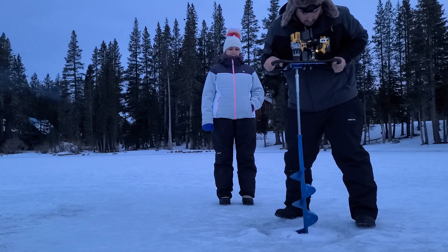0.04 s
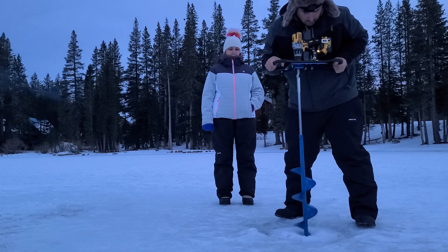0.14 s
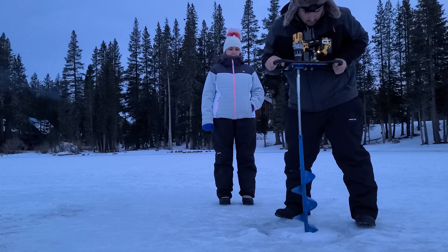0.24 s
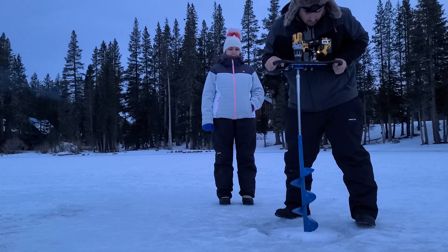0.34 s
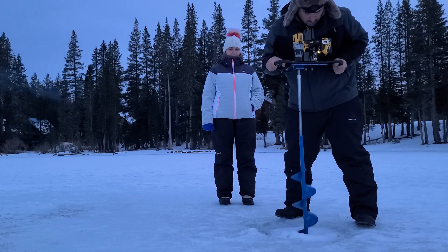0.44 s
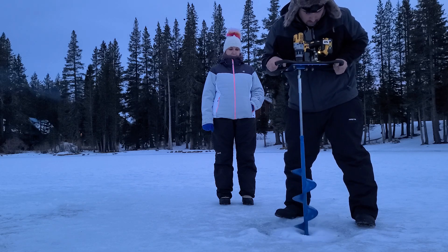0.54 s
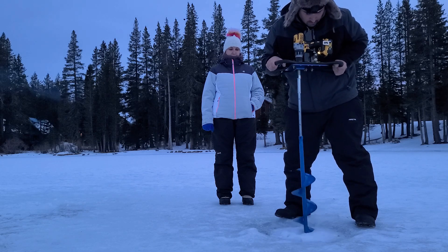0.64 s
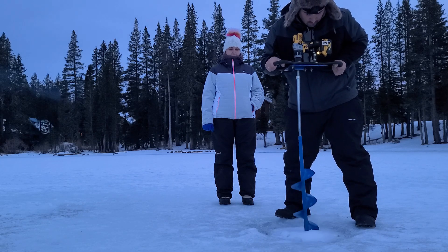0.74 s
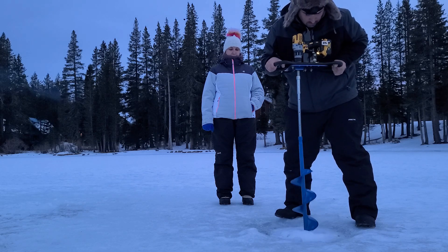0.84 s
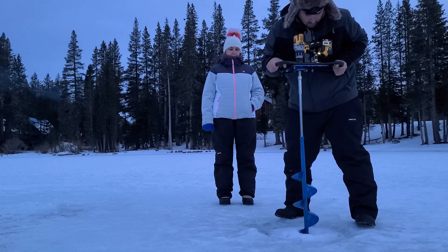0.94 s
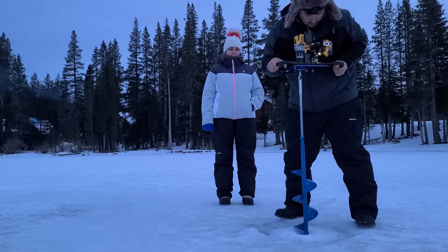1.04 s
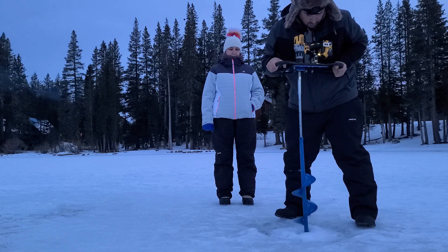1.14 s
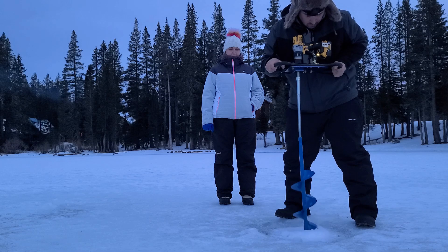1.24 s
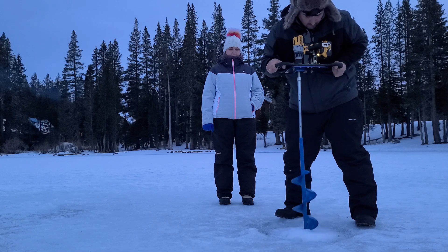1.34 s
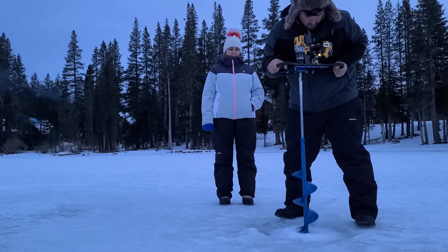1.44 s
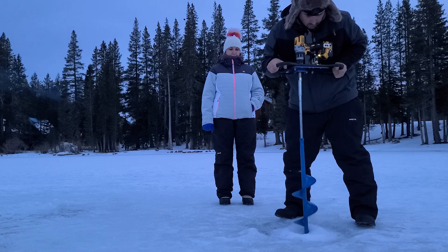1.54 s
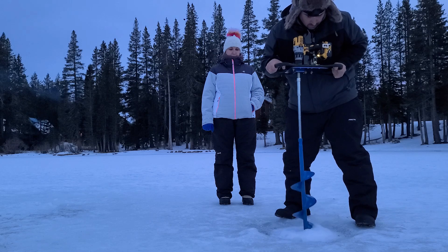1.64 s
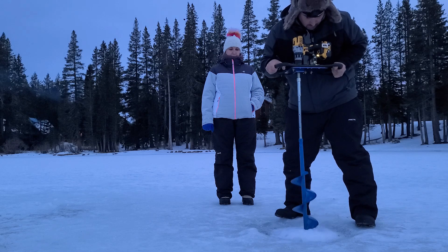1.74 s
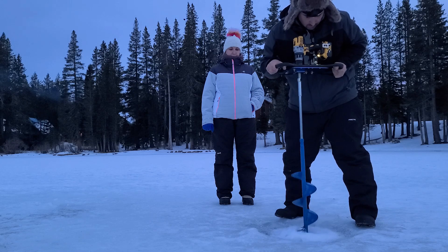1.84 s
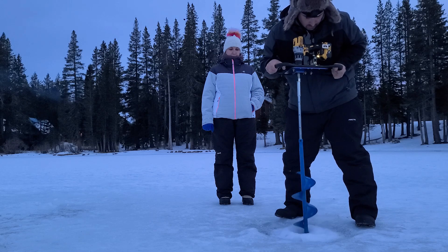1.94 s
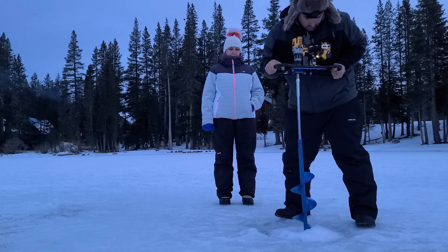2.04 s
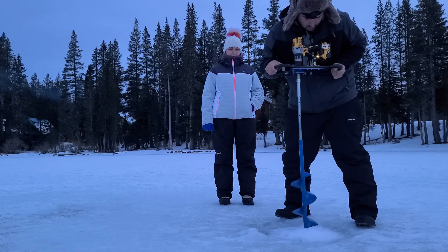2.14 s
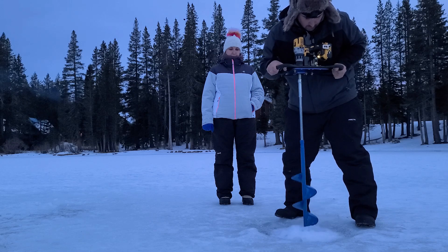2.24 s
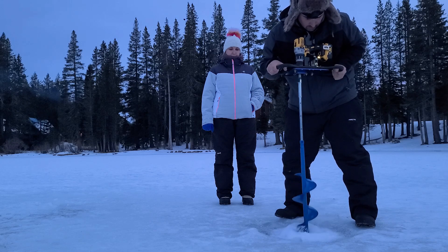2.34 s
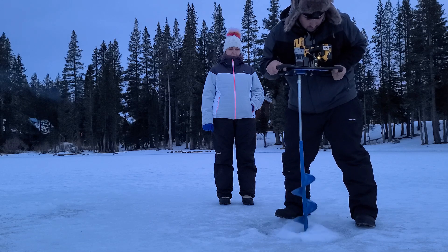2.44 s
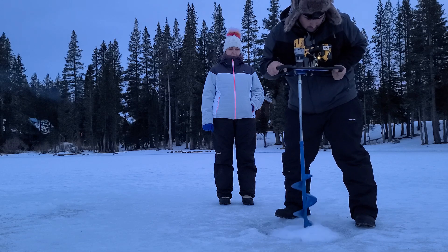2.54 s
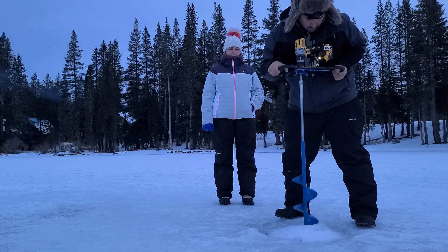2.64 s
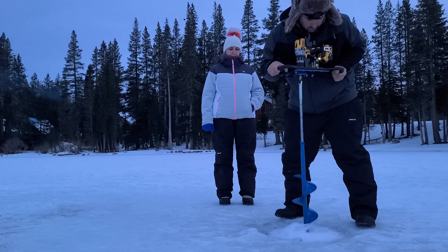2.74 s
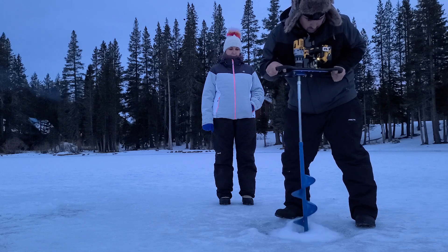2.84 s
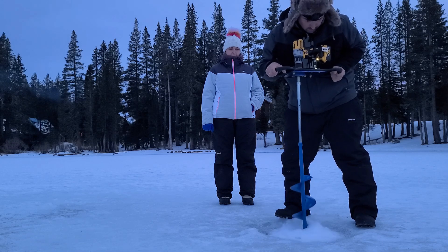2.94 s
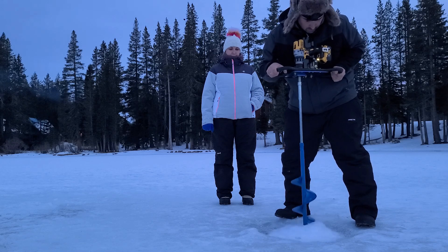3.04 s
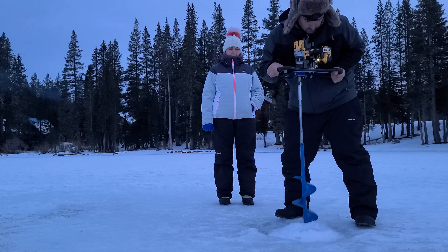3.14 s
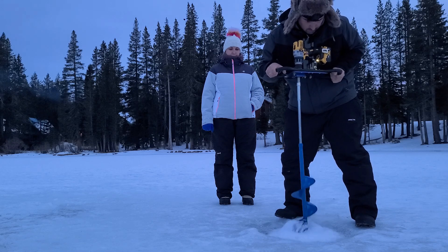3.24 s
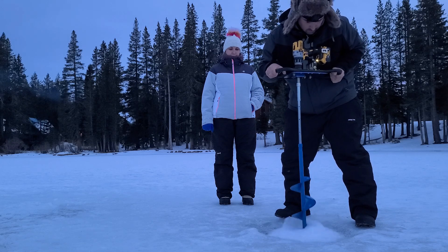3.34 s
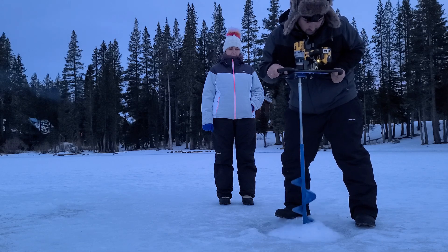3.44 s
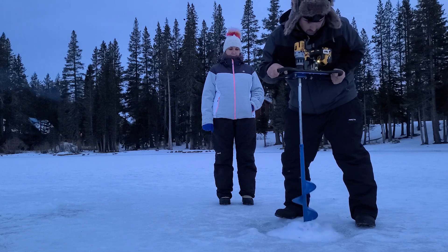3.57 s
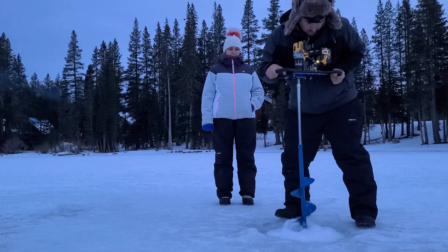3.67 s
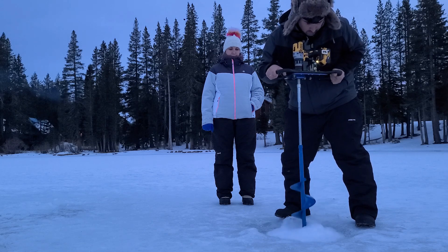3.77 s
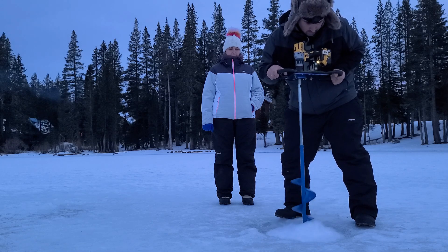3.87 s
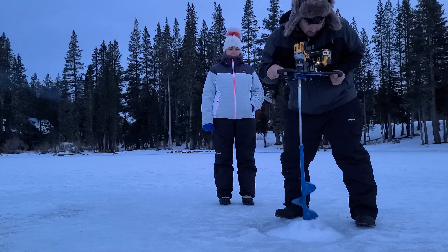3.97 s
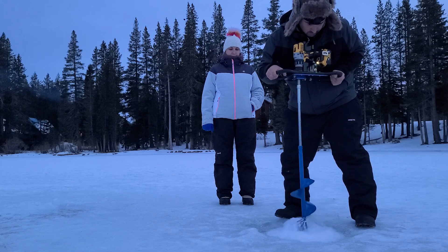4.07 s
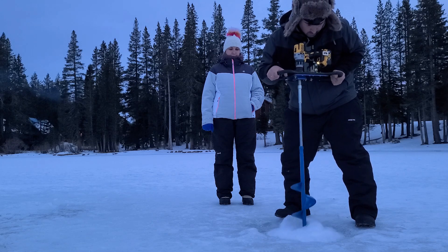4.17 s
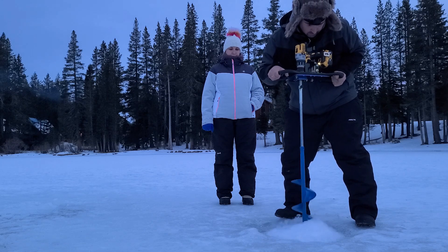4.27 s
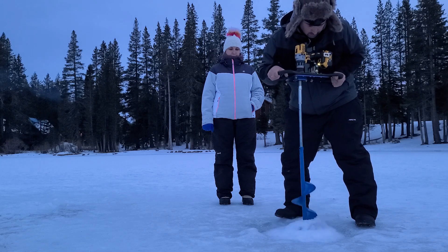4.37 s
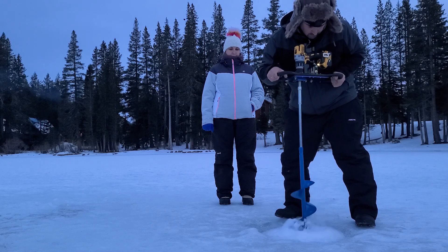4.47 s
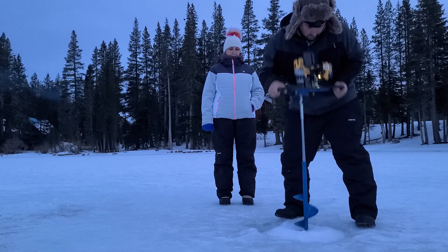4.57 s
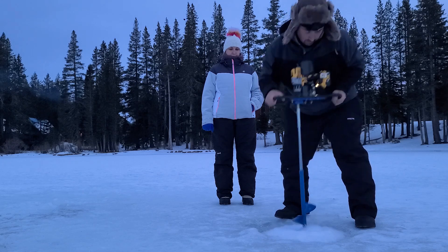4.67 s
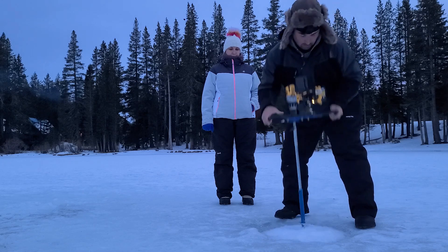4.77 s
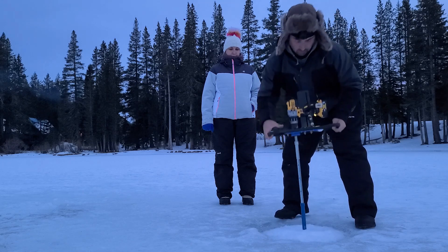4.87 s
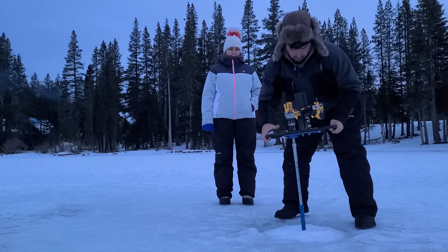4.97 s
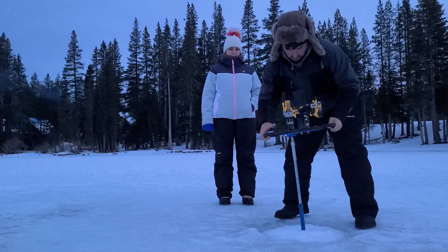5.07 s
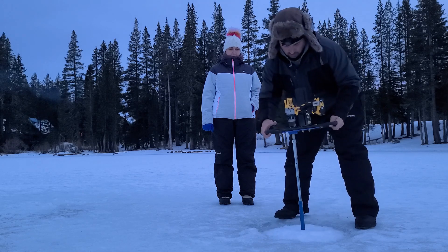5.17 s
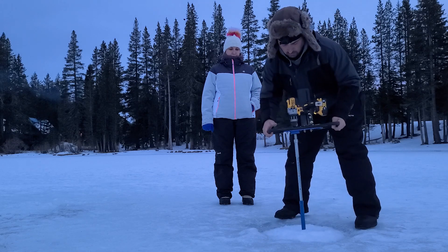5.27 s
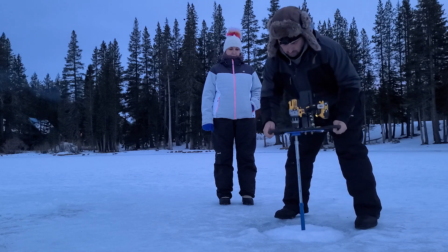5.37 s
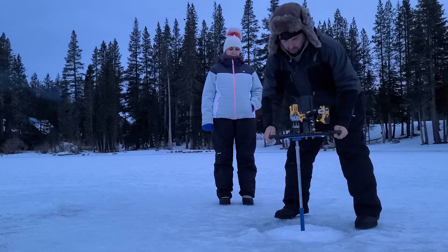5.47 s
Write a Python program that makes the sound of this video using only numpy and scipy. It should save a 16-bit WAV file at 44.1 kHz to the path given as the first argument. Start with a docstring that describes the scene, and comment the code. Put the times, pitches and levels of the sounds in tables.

```python
"""Crunching surges come first, about one a turn: an auger's blades bite lake ice and throw a hissing spray of chips.
The cutting is noise from random fractures, filtered by the ringing steel; the drill's gear tones follow its shaft.
The whine grows as the hole deepens; the bit breaks through with two thumps, spins free and is braked to a stop.
The auger drops into churning, fizzing slush (swelling noise) and its handle clicks (damped modes).
A camera with two close microphones stands on the open ice, where air noise makes a faint hush."""
import sys
import numpy as np
from scipy import signal
from scipy.fft import rfft, irfft, next_fast_len
from scipy.io import wavfile
from scipy.ndimage import uniform_filter1d, map_coordinates

SR = 44100
rng = np.random.default_rng(int(sys.argv[2]) if len(sys.argv) > 2 else 0)


def transcribe(signal):
    """Save signal, clipped to [-1, 1], as a 16-bit WAV file at the path in sys.argv[1]."""
    frames = np.atleast_2d(signal).T
    limited = np.clip(frames, -1, 1)
    pcm = np.round(limited * 32767).astype(np.int16)
    wavfile.write(sys.argv[1], SR, pcm)


N = 242991


def amp(db):
    """Level law: 20 dB is a factor of ten in amplitude."""
    return 10 ** (np.asarray(db) / 20)


def unit(x):
    """Normalisation to an rms of 1."""
    return x / np.sqrt(np.mean(x ** 2) + 1e-20)


def along(points, hz):
    """Spectral interpolation: each column of a table over frequency, read on a log axis."""
    f, *columns = np.transpose(points)
    return np.squeeze([np.interp(np.log(hz + 1), np.log(f + 1), column) for column in columns])


def curves(rows):
    """Linear interpolation in time: one value per sample for each column after the time."""
    s, *columns = np.transpose(rows)
    return [np.interp(np.arange(N) / SR, s, column) for column in columns]


def until(end, fade):
    """Exponential decay: full strength up to the end, then 60 dB down within the fade (both in s)."""
    late = np.maximum(np.arange(N) / SR - end, 0)
    return amp(-60 * late / fade)


def wobble(rate):
    """Band-limited fluctuation: a smooth random curve with rate knots a second."""
    knots = rng.standard_normal(int(N * rate / SR) + 4)
    return map_coordinates(knots, [np.arange(N) * rate / SR])


def filtered(x, response):
    """Linear filtering: the spectrum of x times a response of frequency."""
    m = next_fast_len(N + SR // 2)
    spectrum = rfft(x, m) * response(np.fft.rfftfreq(m, 1 / SR))
    return irfft(spectrum, m)[..., :N]


def add(track, s, sound):
    """Superposition: mix a short sound into a track at s seconds."""
    part = track[..., round(s * SR):][..., :sound.shape[-1]]
    part += sound[..., :part.shape[-1]]


def swells(rows):
    """Power summation: the joint gain of events that each rise to a peak and die away."""
    t = np.arange(N) / SR
    power = 0
    for s, db, rise, fall in rows:
        drop_db = 20 * np.maximum((s - t) / rise, (t - s) / fall)
        power = power + amp(db - drop_db) ** 2
    return np.sqrt(power)


def band(pair, low_hz, high_hz):
    """Band-pass filtering: the part between two frequencies, at rms 1."""
    def under(hz, edge):
        return 1 / (1 + (hz / edge) ** 12)
    return unit(filtered(pair, lambda hz: under(hz, high_hz) - under(hz, low_hz)))


def fractures(rate, spread_db, life, bed):
    """Shot noise: tiny cracks at random moments, each a dying burst of its own size, over finer grinding."""
    happens = rng.random(N) < rate / SR
    sizes = happens * amp(spread_db * np.minimum(rng.standard_normal(N), 2.5))
    power = signal.lfilter([1], [1, -np.exp(-2 / (life * SR))], sizes ** 2)
    return unit(rng.standard_normal((2, N)) * np.sqrt(abs(bed) + power / power.mean()))


# The blades dig in about once a turn and catch briefly in between.
# Each row: start in seconds, length in seconds, load at entry, load at exit (1 = a full bite).
BITE_LOADS = [(0.032, .11, 0.86, 1.05), (0.221, .043, .3, 0.373), (0.391, .16, 1.08, .42),
              (.727, .08, 0.73, 0.37), (0.844, 0.156, 1.29, 0.49), (1.025, 0.0277, .5, 0.66),
              (1.333, .1, .9, 1.014), (1.474, .056, 0.99, 0.46), (1.625, .03, .5, 0.44),
              (1.763, .14, 1.05, 0.632), (2.135, .29, .68, 0.218), (2.501, .22, 0.503, 0.858),
              (2.946, .115, 0.656, 0.586), (3.094, .088, 1.1, 0.544), (3.348, .035, 0.61, .75),
              (3.405, .145, 0.301, 0.933), (3.79, .19, 0.353, .8), (4.165, .035, 0.634, .7),
              (4.226, 0.168, 0.398, 0.788), (4.578, .04, 1, 1.2), (4.7, .025, .6, .7),
              (4.741, .035, .9, 1.55)]
GRIP_S, LET_GO_S = .03, .04  # a bite builds up and lets go


def load():
    """Cutting load: each bite grips, eases or tightens, and lets go; the strongest one counts."""
    t = np.arange(N) / SR
    loads = []
    for start, length, first, last in BITE_LOADS:
        grip = np.minimum((t - start) / GRIP_S, 1 - (t - start - length) / LET_GO_S)
        loads.append(np.clip(grip, 0, 1) * np.interp(t, [start, start + length], [first, last]))
    return np.max(loads, axis=0)


INERTIA_S = .055


def lagging(bite):
    """Inertia: the load as the heavy parts feel it, a little late and smoothed."""
    keep = np.exp(-1 / (INERTIA_S * SR))
    return signal.lfilter([1 - keep], [1, -keep], bite)


# Colour of the scraping. Each row: frequency in Hz, level in dB per Hz.
SCRAPE_COLOUR = [(30, -31.5), (75, -22.5), (135, -23.5), (280, -19.5), (340, -9), (520, -7.5), (700, 0),
                 (1400, -1.5), (2050, -6), (3000, -2), (4300, -6), (7500, -9.5), (11000, -16),
                 (15600, -12.5)]
# Ringing of the steel shaft and flights.
# Each row: frequency in Hz, width in Hz, lift when free in dB, lift when sunk in dB.
STEEL_MODES = [(94, 31, 7, 2), (187.3, 32.3, 11, 7.5), (396.8, 85, 4.5, 8), (818.5, 65, 2, 1.5),
               (1032.1, 61.5, 9, 4.5), (1263.3, 49.2, 10, 4.5), (1365, 124, 2, 3), (1707.2, 66.7, 9.5, 1),
               (1887.4, 73, 4, 4), (2231, 60, 7.5, 7), (2853, 51, 0.5, -4), (3569, 80, -1.5, 1),
               (5150, 83, 1.5, 3), (6056, 150, 3.5, 2), (6473, 110, 5.5, 2), (7157, 106, 5.5, 2),
               (8450, 120, 7, 2.5), (9866, 114, 6.5, -1)]


def steel(hz, depth):
    """Resonance: the scraping's colour is lifted at modes that change as ice grips the flights (depth 0-1)."""
    lift_db = 0
    for centre, width, free_db, sunk_db in STEEL_MODES:
        peak_db = free_db + (sunk_db - free_db) * depth
        lift_db = lift_db + peak_db / (1 + (2 * (hz - centre) / width) ** 2)
    return amp(along(SCRAPE_COLOUR, hz.ravel())[:, None] + lift_db)


def auger(pair, patchy_db):
    """Time-varying filtering: cracks through the sinking auger, whose turning flights favour ever new bands."""
    hz, t, z = signal.stft(pair, SR, nperseg=2048)
    field = rng.standard_normal(z.shape[1:])
    field = uniform_filter1d(field, size=5, axis=0)  # over frequency
    field = uniform_filter1d(field, size=4, axis=1)  # over time
    depth = np.clip((t - 1.2) / 1.96, 0, 1)
    coloured = z * steel(hz[:, None], depth) * amp(patchy_db * unit(field))
    return signal.istft(coloured, SR, nperseg=2048)[1][:, :N]


# Steady grinding under the weight on the auger; it fades once the bit breaks through.
# Each row: time in seconds, level in dB.
FEED_LEVEL = [(0, -0.26), (.12, -0.5), (.19, -2.5), (.5, 0.36), (.66, -2.3), (1.2, -1.35), (2.05, -0.27),
              (2.55, 0.55), (2.85, -0.56), (3.3, 0.31), (3.65, -0.5), (3.74, -2.5), (3.84, 0.31),
              (4.39, 0.63), (4.46, -3.5), (4.62, -1.82), (4.69, -7.5), (4.77, -4.5), (4.83, -10.5),
              (4.91, -6.5), (4.98, -20.5)]
# each layer of the cutting: level between bites, and what a full bite adds (dB)
GROWL_DB, GROWL_BITE_DB = -28.5, 8
SCRAPE_DB, SCRAPE_BITE_DB = -18.5, 5.5
SPRAY_DB, SPRAY_BITE_DB = -19, 1.72
RUMBLE_DB, RUMBLE_BITE_DB = -49, 7
RUMBLE_DB_PER_S = 2.5  # the sheet shakes more as the hole deepens


def blades(bite):
    """Brittle fracture: each bite growls; breaking ice rings the auger, sprays chips and shakes the sheet."""
    feed_db, = curves(FEED_LEVEL)
    t = np.arange(N) / SR
    cracks = fractures(rate=260, spread_db=4.5, life=.0014, bed=3.5)
    cracks = cracks * amp(0.417 * wobble(45))  # the blades grab and slip
    body = auger(cracks, patchy_db=2.5) * amp(feed_db + 0.31 * wobble(22))
    growl = amp(GROWL_DB + GROWL_BITE_DB * bite) * band(body, low_hz=328.1, high_hz=876)
    scrape = amp(SCRAPE_DB + SCRAPE_BITE_DB * bite) * band(body, low_hz=952.7, high_hz=3756)
    chip_noise = band(auger(cracks, patchy_db=3.0), low_hz=3704, high_hz=17950)
    spray = amp(SPRAY_DB + SPRAY_BITE_DB * bite + feed_db) * chip_noise
    heaves = auger(fractures(rate=150, spread_db=4.5, life=0.00396, bed=1.43), patchy_db=0.5)
    rumble_db = RUMBLE_DB + RUMBLE_BITE_DB * lagging(bite) + RUMBLE_DB_PER_S * t
    rumble = amp(rumble_db) * band(heaves, low_hz=26, high_hz=302.3)
    return (growl + scrape + spray) * until(4.98, fade=.06) + rumble * until(4.787, fade=0.767)


# Deep in the hole the gears sing out.
# Each row: time in seconds, peak level in dB, rise in seconds, fall in seconds (both over 20 dB).
REV_SWELLS = [(3.33, -26, .5, 0.05), (4.1, -27.5, 0.39, 0.03)]
# Through the ice, the motor races and is braked.
# Each row: time in seconds, shaft speed in Hz, whine level in dB.
RUN_OUT_COURSE = [(4.7, 315, -40.5), (4.755, 374.7, -29), (4.8, 311, -35.5), (4.812, 342.5, -20.5),
                  (4.825, 375.1, -32), (4.85, 382.5, -32.5), (4.875, 364, -19.5), (4.9, 349, -19),
                  (4.93, 285, -30), (4.955, 194, -46.5), (5.0, 109.5, -60)]
FREE_HZ, SAG_HZ = 379.8, 94.09  # shaft speed unloaded, its drop under a full bite
# the gears grow louder with depth and softer under load
WHINE_DB, WHINE_DB_PER_S, WHINE_BITE_DB = -41.5, 2, -1.5
WHINE_PER_FEED = 2  # dB of whine for each dB of steady grinding


def motor(bite):
    """Speed-load characteristic: shaft speed sags under each bite and recovers, until the motor runs out."""
    t, drag = np.arange(N) / SR, lagging(bite)
    feed_db, = curves(FEED_LEVEL)
    steady = amp(WHINE_DB + WHINE_DB_PER_S * t + WHINE_BITE_DB * drag + WHINE_PER_FEED * feed_db)
    whine_db = 20 * np.log10(np.hypot(steady, swells(REV_SWELLS)))
    cutting = [FREE_HZ - SAG_HZ * drag, whine_db]
    return np.where(t < RUN_OUT_COURSE[0][0], cutting, curves(RUN_OUT_COURSE))


def mesh(tones, shaft_hz, rough, play, flutter_db):
    """Gear meshing: tones of joint rms 1 follow the wavering shaft; play in the teeth roughens them."""
    waver = .009 * wobble(130) + .008 * wobble(30)
    angle = 2 * np.pi * np.cumsum(shaft_hz * (1 + rough * waver)) / SR

    def tone(multiple):
        phase = multiple * angle + play * rough * wobble(600)
        return np.sin(phase) * amp(flutter_db * rough * wobble(110))
    return unit(np.array([sum(amp(db) * tone(multiple) for multiple, db in tones) for _ in range(2)]))


# Gear tones under drive. Each row: multiple of the shaft speed, relative level in dB.
DRIVE_GEARS = [(4, -11), (5, -2), (8, 2.5), (9, -18.5), (16, -8)]
# Tones of the braking gears. Each row: multiple of the shaft speed, relative level in dB.
BRAKING_GEARS = [(4, 3), (5, -10), (9, -14.5)]
# The brake loads the gears on their other flanks.
# Each row: time in seconds, squeal level in dB (1 dB is added on playing), rasp level in dB.
BRAKE_LEVELS = [(4.85, -55, -60), (4.872, -27, -35), (4.9, -27, -36), (4.92, -25.5, -37), (4.945, -29, -30),
                (4.968, -41, -30), (4.985, -55, -52), (5.0, -70, -70)]
# Colour of the brake's rasp. Each row: frequency in Hz, level in dB per Hz.
RASP_COLOUR = [(1500, -36.5), (2400, 2), (2800, 5.5), (3300, -1), (4200, -25), (5900, -14), (7500, -35)]
# Response of the drill's housing. Each row: frequency in Hz, gain in dB.
HOUSING_GAIN = [(400, -27.5), (850, 2), (1200, 4), (1550, -27), (1800, 2), (2200, 6), (2800, 8), (3300, 6),
                (4200, -14), (5900, 3.5), (8000, -14)]
STRAIN_DB, STRAIN_BITE_DB = -42.5, 12  # the lowest gear tone groans with each bite


def drill(bite):
    """Forced vibration: gear tones drive the housing, whining under drive and squealing under the brake."""
    shaft_hz, whine_db = motor(bite)
    squeal_db, rasp_db = curves(BRAKE_LEVELS)
    feed_db, = curves(FEED_LEVEL)
    rough = .6 + .45 * amp(feed_db) + .35 * bite
    driving = amp(whine_db) * mesh(DRIVE_GEARS, shaft_hz, rough, play=.6, flutter_db=2.3)
    groan = mesh(DRIVE_GEARS[:1], shaft_hz, rough, play=0.57, flutter_db=6)
    straining = amp(STRAIN_DB + STRAIN_BITE_DB * bite) * groan * until(4.7, fade=.1)
    braking = amp(squeal_db + 1) * mesh(BRAKING_GEARS, shaft_hz, rough, play=.7, flutter_db=2.3)
    rasp_noise = filtered(rng.standard_normal((2, N)), lambda hz: amp(along(RASP_COLOUR, hz)))
    rasp = amp(rasp_db) * unit(rasp_noise)
    gears = filtered(driving + straining + braking, lambda hz: amp(along(HOUSING_GAIN, hz)))
    return (gears + rasp) * until(5.0, fade=0.048)


# Colour of the open air. Each row: frequency in Hz, level in dB per Hz.
AIR_COLOUR = [(18, -32), (30, 4), (315, -14.5), (546, -15.5), (728, -9.5), (3070, -21), (3490, -18.5),
              (5040, -20.5), (15500, -39)]


def air():
    """Stationary noise: the faint hush of the open lake."""
    hush = filtered(rng.standard_normal((2, N)), lambda hz: amp(along(AIR_COLOUR, hz)))
    return amp(-55.5) * unit(hush)


# The bit breaks through, plunges and later settles in the hole.
# Each row: start in seconds, level in dB before the half-sine envelope, pitch in Hz, length in seconds.
WATER_THUMPS = [(4.68, -9.5, 88.47, 0.0285), (4.68, -17.5, 189.8, 0.015), (4.768, -17.5, 201, 0.0203),
                (4.773, -22, 80, 0.0277), (5.234, -33, 254.5, 0.0127), (5.24, -41.5, 90, 0.033),
                (5.262, -39, 60, 0.047)]
# Slush churns in the hole.
# Each row: time in seconds, peak level in dB, rise in seconds, fall in seconds (both over 20 dB).
SLUSH_SWELLS = [(4.782, -22, 0.14, 0.04), (4.895, -27, 0.142, 0.07), (5.01, -42, .05, .13),
                (5.241, -26, .042, 0.0624), (5.283, -38, 0.059, .05), (5.505, -47, .07, 1.88)]
# Colour of the slush. Each row: frequency in Hz, level in dB per Hz.
SLUSH_COLOUR = [(30, -24.5), (55, -13.5), (250, -11.5), (420, -8), (700, -10.5), (1100, -14.5), (2400, -15),
                (3600, -20), (7000, -27), (10500, -35.5), (15500, -33.5)]


def plunge():
    """Transient oscillation: water in the hole takes a few heavy swings, and the slush churns."""
    swings = np.zeros((2, N))
    for s, db, hz, length in WATER_THUMPS:
        t = np.arange(int(length * SR)) / SR
        swing = -amp(db) * np.sin(np.pi * t / length) * np.sin(2 * np.pi * hz * t)
        add(swings[0], s, swing)  # in the direct wave only
    splashes = fractures(rate=450, spread_db=6, life=0.00178, bed=0.67)
    churn = unit(filtered(splashes, lambda hz: amp(along(SLUSH_COLOUR, hz))))
    return swings + swells(SLUSH_SWELLS) * churn


# Wet ice fizzes, first off the freed auger, later in the stirred slush.
# Each row: time in seconds, peak level in dB, rise in seconds, fall in seconds (both over 20 dB).
FIZZ_SWELLS = [(4.729, -15, 0.026, 0.027), (4.78, -21, .08, 0.0027), (4.893, -21.5, 0.15, 0.0654),
               (5.245, -45, .03, .04), (5.283, -40.5, .03, 0.01)]
# Colour of the fizz. Each row: frequency in Hz, level in dB per Hz.
FIZZ_COLOUR = [(2500, -27.5), (5000, -8), (9000, -7.5), (12500, -1.5), (15500, -1.5)]


def fizz():
    """Dense shot noise: wet ice fizzes, first off the freed auger, later in the stirred slush."""
    drops = fractures(rate=1200, spread_db=3, life=.001, bed=1.2)
    return swells(FIZZ_SWELLS) * unit(filtered(drops, lambda hz: amp(along(FIZZ_COLOUR, hz))))


# Chips of ice crack and land.
# Each row: start in seconds, relative level in dB, 60 dB decay time in seconds.
ICE_CHIPS = [(4.726, -6, 0.05), (4.779, -8.5, .04), (4.9802, -18.5, 0.026), (4.997, -19, 0.018),
             (5.0649, -45.5, .014), (5.0902, -23, 0.0092), (5.106, -27.5, 0.0126), (5.2037, -24.5, 0.0207),
             (5.2405, -18.5, 0.0203), (5.282, -24, 0.0266), (5.297, -24.5, 0.0143), (5.382, -34, 0.0132)]
# Colour of the snapping ice. Each row: frequency in Hz, level in dB per Hz.
BRITTLE_COLOUR = [(300, 1), (1200, 6), (3000, 0), (6000, 1.5), (9000, -10), (15500, -24)]


def chips():
    """Impulsive fracture: single pieces of ice snap with a dry, decaying tick of noise."""
    ticks, t = np.zeros((2, N)), np.arange(SR // 20) / SR
    for s, db, t60 in ICE_CHIPS:
        add(ticks, s, amp(db - 3 - 60 * t / t60) * rng.standard_normal((2, len(t))))
    return filtered(ticks, lambda hz: amp(along(BRITTLE_COLOUR, hz)))


# The handle and coupling knock.
# Each row: start in seconds, relative level in dB, extra level in dB of the modes below 2000 Hz.
HANDLE_KNOCKS = [(5.189, -35, -0.5), (5.233, -26.5, 8.5), (5.28, -23.5, -8), (5.371, -27, 1),
                 (5.393, -33.5, -5.5), (5.419, -30, -15), (5.481, -31, -6), (5.489, -27, 5)]
# Modes of the handle. Each row: frequency in Hz, relative level in dB, 60 dB decay time in seconds.
HANDLE_MODES = [(1136, -2, 0.0343), (2407, 4, 0.021), (2795, -4.5, .02), (3146, -1, .025),
                (3835, -6, 0.016), (5250, -5, 0.022), (5940, -3, 0.0148)]


def handle():
    """Modal impact: play in the coupling makes each knock a short scuff and a damped ring."""
    knocks, t = np.zeros((2, N)), np.arange(SR // 10) / SR
    for s, db, low_db in HANDLE_KNOCKS:
        ring = 0
        for hz, level_db, t60 in HANDLE_MODES:
            mode_db = level_db + low_db * (hz < 2000) + rng.normal(0, 3.0)
            cycles = hz * rng.normal(1, 0.0306) * t + rng.random((2, 1))
            ring = ring + amp(mode_db - 60 * t / t60) * np.sin(2 * np.pi * cycles)
        grit = signal.lfilter([1], [1, -.6], rng.standard_normal((2, len(t))))
        scuff = 0.475 * amp(-60 * t / 0.0424) * grit
        onset = 1 - np.exp(-t / 0.00089)
        add(knocks, s, amp(db - 8) * (ring + scuff) * onset)
    return knocks


# The auger at the two microphones.
# Each row: frequency in Hz, left minus right in dB, left lag in radians, likeness from 0 to 1.
MICROPHONE_PORTS = [(100, -.5, .07, .98), (700, -.7, .45, .99), (1500, -1.6, .85, .91),
                    (2400, -.3, 1.0, .79), (3400, 4.1, 1.0, .64), (4300, 6.8, 3.0, .5),
                    (5500, 5.5, 3.6, .61), (6700, 9.7, 4.1, .47), (8000, 3.2, 4.3, .37),
                    (9200, 1.4, 6.6, .42), (11000, -.5, 6.8, .23), (13000, 3.9, 9.1, .26),
                    (15000, 6, 10.5, .18)]


def microphones(pair):
    """Interchannel coherence: a direct and a scattered wave become left and right, with shadow and delay."""
    def mix(hz):
        tilt_db, lag, alike = along(MICROPHONE_PORTS, hz)
        turn = np.arccos(np.clip(alike, 0, 1)) / 2  # more scattered wave, less likeness
        gain = np.array([amp(tilt_db) * np.exp(-1j * lag), np.ones_like(hz)])
        gain = gain * np.sqrt(2 / (1 + amp(tilt_db) ** 2))  # keeps the joint power
        waves = np.array([[np.cos(turn), np.sin(turn)], [np.cos(turn), -np.sin(turn)]])
        return gain[:, None] * waves
    return filtered(pair, mix).sum(axis=1)


def scene():
    """Free-field superposition: everything passes the same two microphones, on open ice with no echo."""
    bite = load()
    return microphones(blades(bite) + drill(bite) + air() + plunge() + fizz() + chips() + handle())


TOP_HZ = 15780


def record(dry):
    """Saturation and band limiting: the camera rounds off the highest peaks and cuts steeply above its limit."""
    rounded = dry / (1 + np.abs(dry) ** 8) ** (1 / 8)
    return filtered(rounded, lambda hz: 1 / (1 + (hz / TOP_HZ) ** 400))


dry = scene()
out = record(dry)
transcribe(out)
```